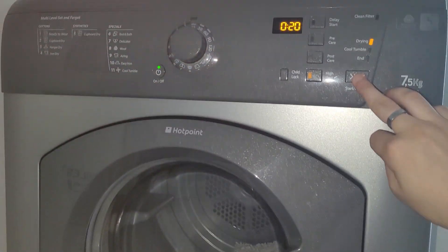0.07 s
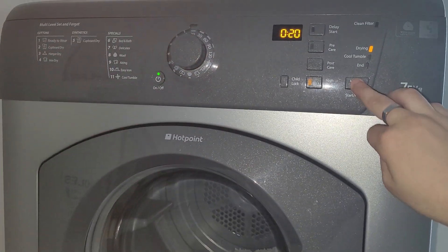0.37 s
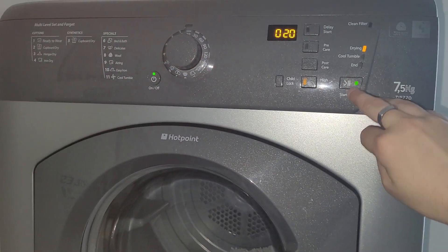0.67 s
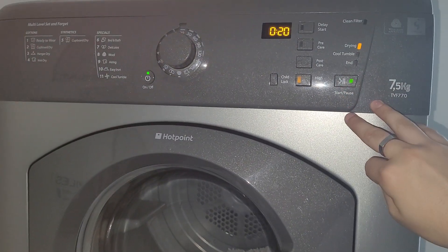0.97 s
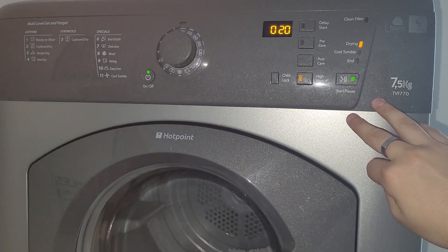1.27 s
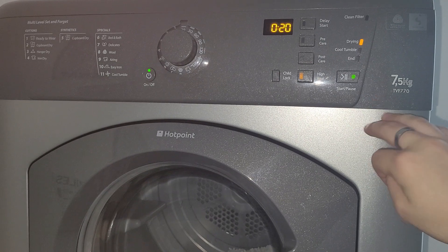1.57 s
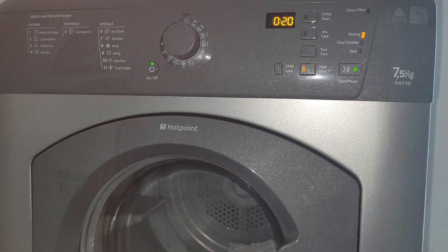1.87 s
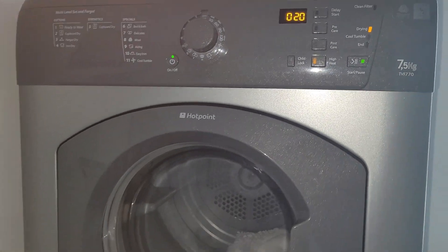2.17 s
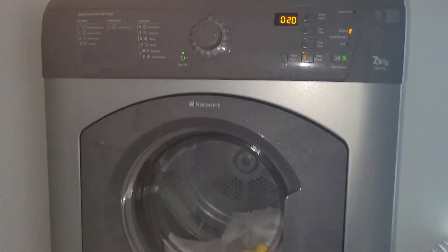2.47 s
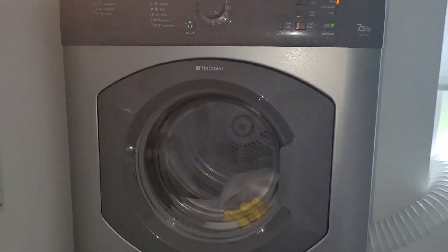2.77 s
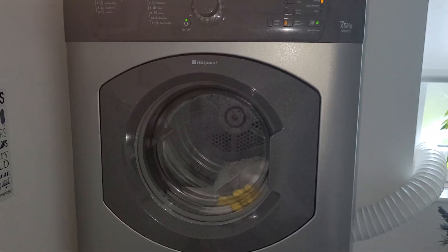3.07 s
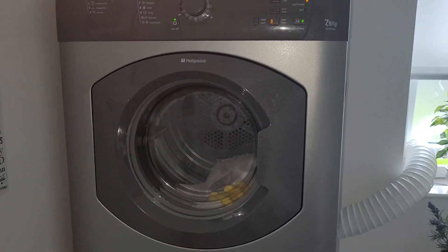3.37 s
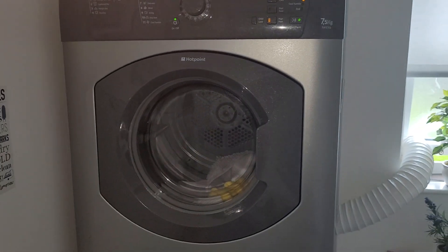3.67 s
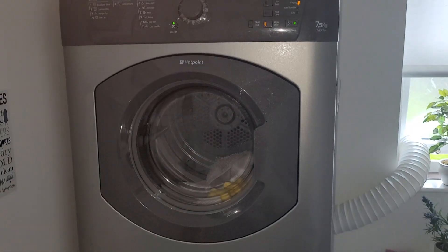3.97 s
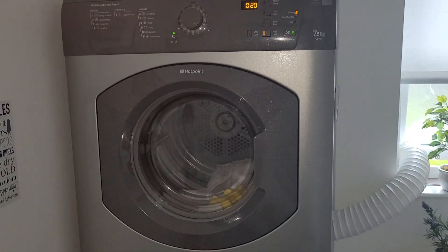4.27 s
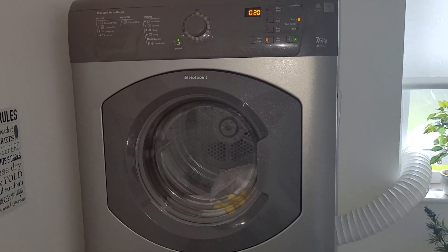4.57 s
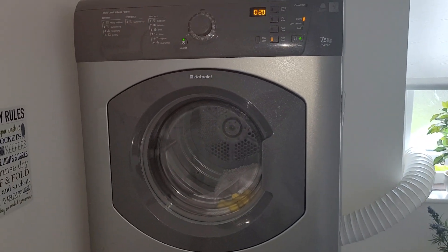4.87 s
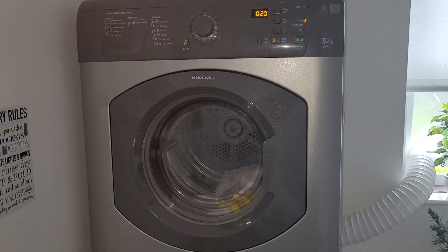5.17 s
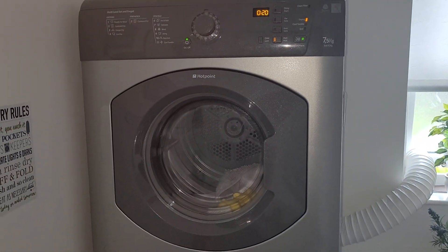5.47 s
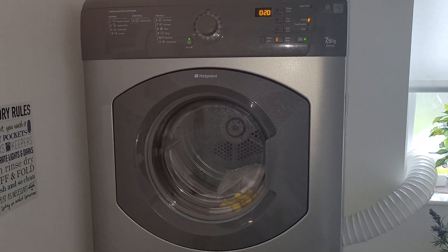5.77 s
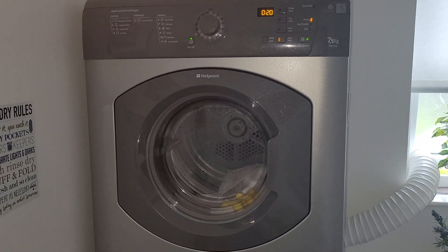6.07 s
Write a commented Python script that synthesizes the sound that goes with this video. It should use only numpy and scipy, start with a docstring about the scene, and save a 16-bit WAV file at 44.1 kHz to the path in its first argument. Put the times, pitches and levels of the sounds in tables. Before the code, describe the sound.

A tumble dryer is started in a small, hard-walled room, heard from nearby. A finger rubs faintly on a plastic button, then presses and releases it, giving a quick cluster of clicks from about 0.3 to 0.7 seconds, the last with a tiny spring ring. A quiet wait follows, with low room tone, faint sleeve rustle and a few soft bumps and ticks. At about 3.2 seconds a relay clicks and the motor starts with a growl, a rising whirr and a brief belt groan. By about 3.7 seconds it is at full speed and much louder than the pause. From there to the end, at around 6 seconds, the dryer runs steadily with a deep, slightly pulsing electric hum, a drum rumbling in its metal cabinet and a whoosh of fan air. Laundry hisses softly on the steel, sliding roughly every 0.6 seconds.

```python
"""A small, hard-walled room with a tumble dryer. A finger presses and releases the plastic start button;
a sleeve rustles through a quiet wait, then a relay closes. The induction motor growls, whirrs and hums
up to speed while the belt groans until it grips. The drum rumbles in its sheet-metal cabinet,
washing hisses on the steel and the fan blows air through the vent hose."""
import sys
import numpy as np
from scipy import signal
from scipy.fft import rfft, irfft
from scipy.io import wavfile

SR = 44100
rng = np.random.default_rng(int(sys.argv[2]) if len(sys.argv) > 2 else 0)


def digitize_waveform(pressure):
    """Quantize a signal to 16-bit integers and store it at the path in sys.argv[1].

    Rows of a 2-D input are taken as channels; values are limited to [-1, 1].
    """
    field = np.atleast_2d(pressure).T
    bounded = np.clip(field, -1, 1)
    quanta = np.round(bounded * 32767).astype(np.int16)
    wavfile.write(sys.argv[1], SR, quanta)


N = 269892
TIME = np.arange(N) / SR
FREQS = np.maximum(np.fft.rfftfreq(N, 1 / SR), 1)
MAINS_HZ, SHAFT_HZ = 50, 48.46
ROTOR_START_S = 3.2
# room sound field: (frequency [Hz], left-right correlation [-])
EAR_CORRELATION = [(30, 1), (100, 0.88), (180, 0.93), (330, 0.86), (650, 0.42), (1300, -0.31),
                   (2500, -0.067), (15000, -0.0096)]


def from_db(db):
    """Decibels to gain."""
    return 10 ** (np.asarray(db) / 20)


def unit_rms(x):
    """Scale to rms 1."""
    return x / np.sqrt(np.mean(x ** 2) + 1e-20)


def at_hz(points, hz=FREQS):
    """Interpolate a table over log frequency."""
    return np.interp(np.log(hz), np.log(np.array(points)[:, 0]), np.array(points)[:, 1])


def drift(rate_hz):
    """Random wander, rms 1."""
    return unit_rms(irfft(rfft(rng.standard_normal(N)) / (1 + (FREQS / rate_hz) ** 2), N))


def envelope(start_s, attack_s, hold_s, release_s):
    """Linear rise to 1, hold, exponential fall."""
    age = TIME - start_s
    return np.clip(age / attack_s, 0, 1) * np.exp(-np.maximum(age - attack_s - hold_s, 0) / release_s)


def resonances(modes):
    """Gain spectrum of steep-sided resonances."""
    power = sum(from_db(2 * db) / (1 + (2 * (FREQS - hz) / width_hz) ** 2) ** 2
                for hz, width_hz, db in modes)
    return np.sqrt(power)


def ring(x, modes):
    """Parallel two-pole resonators, alternating in sign."""
    out = 0
    for k, (hz, width_hz, db) in enumerate(modes):
        r = np.exp(-np.pi * width_hz / SR)
        mode = signal.lfilter([1, 0, -1], [1, -2 * r * np.cos(2 * np.pi * hz / SR), r * r], x)
        out = out + (-1) ** k * from_db(db) * (1 - r * r) / 2 * mode
    return out


def stereo_spectra(size, hz):
    """Left and right white-noise spectra: alike in the bass, diffuse above."""
    mid, side = rfft(rng.standard_normal((2, size)))
    alike = np.clip(at_hz(EAR_CORRELATION, hz), -.999, .999)
    return np.sqrt(1 + alike) * mid + np.sqrt(1 - alike) * side * [[1], [-1]]


def noise(colour):
    """Stereo noise with the given gain spectrum, rms 1."""
    # stereo balance: (frequency [Hz], left minus right [dB])
    balance = [(60, 0), (92, 0.5), (140, 2.5), (210, 1.5), (330, -2.5), (500, -0.5), (770, -0.5),
               (1170, -3), (1790, 0.5), (2740, 2), (4190, 2), (6410, -4), (9810, 0.5), (15000, 1)]
    pan = from_db(at_hz(balance) / 2 * [[1], [-1]])
    return unit_rms(irfft(stereo_spectra(N, FREQS) * colour * pan, N))


def room_response(direct_db, build_s=0.0017):
    """Direct path plus dense wall reflections, longest in the low mids; energy 1."""
    # reverberation: (frequency [Hz], T60 [s])
    decay_times = [(100, 0.17), (260, 0.46), (700, 0.41), (1840, 0.25), (4850, 0.28), (12800, 0.26)]
    t = TIME[:SR // 2]
    hz = np.maximum(np.fft.rfftfreq(len(t), 1 / SR), 1)
    spectra = stereo_spectra(len(t), hz)
    centres_hz, t60s = np.transpose(decay_times)
    bands = [np.interp(np.log(hz), np.log(centres_hz), row) for row in np.eye(len(t60s))]
    tail = sum(irfft(spectra * band, len(t)) * from_db(-60 * t / t60) for band, t60 in zip(bands, t60s))
    response = unit_rms(tail * (1 - np.exp(-t / build_s))) / np.sqrt(len(t))
    response[:, 0] += from_db(direct_db)
    return unit_rms(response) / np.sqrt(len(t))


def murmur(corner_hz=7000):
    """Dull noise in the colour of the quiet room."""
    # spectrum before the low-pass: (frequency [Hz], relative density [dB])
    spectrum = [(15, -39), (25, -7.5), (152, -8.5), (189, -11.5), (261, -2.5), (392, -8), (729, -15),
                (955, -18), (1090, -24.5), (2030, -31.5), (2520, -35), (5090, -46), (7420, -33.5),
                (9210, -45), (15800, -25)]
    return noise(from_db(at_hz(spectrum)) / np.hypot(1, (FREQS / corner_hz) ** 2))


def room_tone(tone_db=-59.5, sway_db=0.9, stir_db=-74.5, stir_spread_db=4.0):
    """A low murmur with an uneven midrange stir."""
    # (frequency [Hz], width [Hz], gain [dB])
    stir_bands = [(800, 340, -5.0), (1470, 300, -13), (2910, 170, -22.5)]
    stir = from_db(stir_db + stir_spread_db * drift(12.0)) * noise(resonances(stir_bands))
    return from_db(tone_db + sway_db * drift(8.3)) * murmur() + stir


def finger_squeak(squeak_db=-72.0, rub_db=-55.5):
    """Skin settles on the plastic button: a faint squeak over a dull rub."""
    # skin on plastic: (frequency [Hz], width [Hz], gain [dB])
    squeak_modes = [(2810, 220, -1), (3920, 540, -14), (6860, 1200, -16)]
    rubbing = from_db(squeak_db) * noise(resonances(squeak_modes)) + from_db(rub_db) * murmur()
    return envelope(0, attack_s=0.015, hold_s=0.041, release_s=0.1) * rubbing


def button_and_relay(level_window_s=0.023):
    """Each contact rings panel, button and spring into the room; a slow push swells slowly."""
    # contacts: (time [s], swell [s], direct path [dB], panel [dB], button [dB], tick [dB], spring [dB])
    contacts = [(0.2879, 0.0048, -21, -38.5, -31.5, -51, -78), (0.413, 0.0016, -15, -46, -47, -53, -83),
                (0.554, 0.0018, -13, -33, -55, -63, -81), (0.562, 0.0033, -19, -32, -39.5, -56, -79),
                (0.5987, 0.0004, -9, -63, -36, -55.5, -82), (0.680, 0.0034, -26, -69, -43.5, -54.5, -45.5),
                (3.172, 0.0051, -19.5, -41.5, -52, -48, -66)]
    # thud, clack, tick and ring modes: (frequency [Hz], width [Hz], gain [dB])
    panel = [(50, 9.6, -6), (122, 22, -2), (184, 26, 3), (253, 60, -1), (417, 58, 1), (519, 18, -1.5),
             (626, 46, -11)]
    button = [(834, 510, -5), (1390, 270, 2), (1640, 400, 0), (2130, 330, 1.5), (2870, 500, -4.5),
              (3680, 260, -5), (4180, 350, -8.5)]
    tick = [(3980, 3000, 7.9), (7360, 4800, 8.7), (10570, 3600, 5.7), (15000, 2800, 8.1)]
    spring = [(1670, 120, 2.5), (7040, 120, 0.5), (8100, 600, -8.5), (11100, 700, -13.5)]
    out = np.zeros((2, N))
    for time_s, swell_s, direct_db, *levels_db in contacts:
        impact = room_response(direct_db, swell_s)
        start, size = int(time_s * SR), impact.shape[1]
        for modes, db in zip((panel, button, tick, spring), levels_db):
            gain = from_db(db) * np.sqrt(level_window_s * SR / size)
            out[:, start:start + size] += gain * unit_rms(ring(impact, modes))
    return out


def handling_knocks(width_share=0.35):
    """Faint padded knocks, each a puff of noise around one pitch."""
    # (time [s], level [dB], pitch [Hz])
    knocks = [(0.99, -64, 910), (1.44, -66, 800), (1.55, -64, 764), (2.43, -71, 2000), (2.61, -64, 720),
              (3.01, -68, 1300)]
    out = 0
    for time_s, db, hz in knocks:
        level = from_db(db) * envelope(time_s, attack_s=0.01, hold_s=0.015, release_s=0.045)
        out = out + level * noise(resonances([(hz, width_share * hz, 0)]))
    return out


def hand_rustle(sleeve_db=-78.0):
    """The sleeve whispers as the hand draws back; sharper moves add a swish and a dull bump."""
    # (start [s], attack [s], release [s], swish [dB], bump [dB])
    moves = [(1.08, .04, .05, -83, -70), (1.27, .035, .04, -79, -64), (1.39, .1, 0.29, -97, -60),
             (1.57, .02, .03, -70, -75), (1.64, .05, 0.053, -76, -78), (1.955, 0.034, 0.039, -61, -56.5),
             (2.41, 0.051, 0.024, -67.5, -55), (3.0, .012, 0.044, -76, -58.5)]
    # sleeve cloth: (frequency [Hz], relative density [dB])
    spectrum = [(1000, -8), (2300, -14), (4500, 0), (7000, -1), (9000, -1.5), (12000, 2), (15000, 8)]
    swish = from_db(sleeve_db + 2 * drift(4)) * envelope(1.5, attack_s=0.36, hold_s=0.56, release_s=1.6)
    bump = 0
    for start_s, attack_s, release_s, swish_db, bump_db in moves:
        shape = envelope(start_s, attack_s, 0, release_s)
        swish = np.hypot(swish, from_db(swish_db) * shape)
        bump = bump + from_db(bump_db) * shape
    return swish * noise(from_db(at_hz(spectrum))) + bump * murmur()


def near_ticks():
    """Tiny ticks, close and dry."""
    # (time [s], peak [dB], centre [Hz], width [Hz])
    ticks = [(2.0995, -51.5, 595, 890), (2.4237, -54, 8500, 4000)]
    impulse = signal.unit_impulse(SR // 100)
    out = np.zeros(N)
    for time_s, db, hz, width_hz in ticks:
        tick = ring(ring(impulse, [(hz, width_hz, 0)]), [(hz, 2 * width_hz, 0)])
        start = int(time_s * SR)
        out[start:start + len(tick)] += from_db(db) * tick / np.abs(tick).max()
    return out


def motor_strain(strain_db=-43.0, power_on_s=3.18, buzz_depth=0.19):
    """Starting current makes the frame growl, pulsing at twice the mains frequency."""
    # motor frame: (frequency [Hz], width [Hz], gain [dB])
    frame_modes = [(256, 76, 2.5), (276, 34, -0.5), (399, 60, 4), (720, 410, -8), (1830, 360, -18.5),
                   (2570, 650, -24), (3950, 500, -32)]
    level = from_db(strain_db) * envelope(power_on_s, attack_s=0.12, hold_s=0.12, release_s=0.11)
    pulses = 1 + buzz_depth * np.sin(2 * np.pi * 2 * MAINS_HZ * TIME)
    return level * pulses * noise(resonances(frame_modes))


def motor_speed(run_up_s=0.5):
    """Share of full speed: the rotor picks up briskly, then eases in."""
    return np.sin(np.pi / 2 * np.clip((TIME - ROTOR_START_S) / run_up_s, 0, 1))


def belt_groan(speed, groan_db=-39.0, swell_db=16.0, rough_db=2.5, low_hz=389.0, rise_hz=69.0):
    """The belt drags on the heavy drum, higher and louder with speed, until it grips."""
    drag = speed ** 3
    slipping = envelope(ROTOR_START_S, attack_s=0.1, hold_s=0.31, release_s=0.03)
    level = from_db(groan_db - swell_db * (1 - drag) + rough_db * drift(25)) * slipping
    phase = 2 * np.pi * np.cumsum(low_hz + rise_hz * drag) / SR + 0.6 * drift(15)
    return np.sqrt(2) * level * np.sin(phase)


def rotating_parts(speed, wander_rad=0.24, flutter_db=2.5, right_bias_db=4.5, right_lag_s=0.00037):
    """Shaft unbalance, fan blades, belt and rollers sing tones that rise and swell with speed."""
    # shaft and fan at full speed: (shaft multiple [-], level [dB])
    shaft_orders = [(1, -43.5), (5, -52), (6, -41.5), (7, -50), (9, -54), (21, -57)]
    # belt and rollers at full speed: (frequency [Hz], level [dB])
    pulley_tones = [(261.5, -55.5), (327, -59), (448.6, -44)]
    travel_s = np.cumsum(speed) / SR - np.array([[0], [right_lag_s]])
    tones = 0
    for hz, db in [(k * SHAFT_HZ, db) for k, db in shaft_orders] + pulley_tones:
        phase = 2 * np.pi * (hz * travel_s + rng.random()) + wander_rad * drift(1.6)
        tones = tones + from_db(db + flutter_db * drift(5.8)) * np.sin(phase)
    pan = from_db([[-right_bias_db / 2], [right_bias_db / 2]])
    return np.sqrt(2) * tones * speed ** 3.8 * pan


def drum_rumble(speed, rumble_db=-31.0, tumble_db=0.5, judder_hz=44.2, judder_depth=0.16):
    """The drum judders on its bearings and drives the cabinet's resonances."""
    # cabinet and drum: (frequency [Hz], width [Hz], gain [dB])
    cabinet_modes = [(30, 14, -22), (64.4, 10.4, 1.5), (88.1, 11.5, 5.5), (127, 14.6, -4.5),
                     (149.7, 28, -9), (183, 45, -20), (229.4, 12, -11), (258, 27, -4), (249, 15, -8),
                     (281, 16, -1.5), (330.5, 19.7, 2), (371, 19, -7), (412, 59, -6.5), (433, 61, -10),
                     (458, 96, -9), (495, 22, -16), (593, 29, -14), (652, 27.6, -9), (760, 69, -14.5),
                     (858, 27, -19.5), (1013, 5.5, -21), (1264, 33, -18.5)]
    judder_phase = 2 * np.pi * judder_hz * np.cumsum(speed) / SR + 2 * drift(0.97)
    level = from_db(rumble_db + tumble_db * drift(8.5)) * speed ** 4.7
    return level * (1 + judder_depth * np.sin(judder_phase)) * noise(resonances(cabinet_modes))


def fan_air(speed, rush_db=-43.5, duct_db=-53):
    """Fan air grows with speed; housing and hose ring before the rush builds."""
    # air rush: (frequency [Hz], relative density [dB])
    spectrum = [(300, -42), (550, -9.5), (850, -9.5), (1100, -14), (1400, -16), (2200, -15), (2600, -20),
                (3500, -18.5), (4200, -21), (4700, -26.5), (6000, -32.5), (7500, -34), (9000, -53)]
    # fan housing and vent hose: (frequency [Hz], width [Hz], gain [dB])
    duct_modes = [(1190, 40, -23), (1480, 30, -14), (1796, 130, -14.5), (2285, 120, -19.5), (2840, 39, -15),
                  (3090, 31, -19), (3910, 60, -16), (3884, 330, -17)]
    rush = from_db(rush_db) * speed ** 2.8 * noise(from_db(at_hz(spectrum)))
    duct = from_db(duct_db) * speed ** 1.3 * noise(resonances(duct_modes))
    return rush + duct


def washing_slides(speed, drag_db=-55.0, slide_db=-54.0, bright_hz=9000.0, loosen_s=1.0):
    """Washing hisses on the steel: a steady drag, and two brighter slides each time a paddle tips it."""
    first_tip_s, tip_every_s = 3.49, 0.585
    folds = [(0, 0), (0.17, -5)]   # (delay [s], gain [dB])
    tips_s = first_tip_s + tip_every_s * np.arange(N / SR / tip_every_s)
    slides = sum(from_db(db) * envelope(tip_s + delay_s, attack_s=0.057, hold_s=0.04, release_s=0.05)
                 for tip_s in tips_s for delay_s, db in folds)
    # cloth on steel: (frequency [Hz], relative density [dB])
    spectrum = [(3000, -22), (5000, 0), (6500, -3), (7800, -5), (8900, -9.5), (10300, -4.5), (13400, -5.5),
                (14400, 1), (15100, 3.5), (15800, -5.5)]
    colour = from_db(at_hz(spectrum))
    bright = colour / np.hypot(1, (bright_hz / FREQS) ** 2)
    loosened = np.clip((TIME - ROTOR_START_S) / loosen_s, 0, 1)
    drag = from_db(drag_db) * noise(colour)
    return speed ** 1.7 * (drag + from_db(slide_db) * loosened * slides * noise(bright))


def motor_hum(hum_db=-27.0, start_s=3.236, attack_s=0.2, beat_depth=0.2, beat_trough_s=4.07):
    """Iron hums at twice the mains, dips as the run-up ends and beats against the slipping rotor."""
    # (hum harmonic [-], gain [dB])
    partials = [(1, -1), (2, -25), (3, -22), (4, -48.5)]
    dip_db, dip_s, dip_width_s = -6.5, 3.64, 0.084
    dip = np.exp(-((TIME - dip_s) / dip_width_s) ** 2)
    level = from_db(hum_db + dip_db * dip) * np.clip((TIME - start_s) / attack_s, 0, 1)
    phase = 2 * np.pi * 2 * MAINS_HZ * TIME + 0.08 * drift(11.0)
    slip_phase = 2 * np.pi * 2 * (MAINS_HZ - SHAFT_HZ) * (TIME - beat_trough_s)
    hum = sum(from_db(db) * np.sin(k * phase + rng.uniform(0, 2 * np.pi) * (k > 1))
              for k, db in partials)
    return np.sqrt(2) * level * (hum - beat_depth * np.sin(phase - slip_phase))


def rotor_whirr(speed, whirr_db=-46.0, low_hz=636.0, rise_hz=275.3, half_width_hz=125.0):
    """A narrow noise band slides up with the rotor and fades as the starting current drops."""
    level = from_db(whirr_db) * envelope(3.3, attack_s=0.085, hold_s=0.025, release_s=0.1)
    flutter = noise(1 / (1 + (FREQS / half_width_hz) ** 4))
    phase = 2 * np.pi * np.cumsum(low_hz + rise_hz * speed) / SR
    return np.sqrt(2) * level * flutter * np.sin(phase)


def cloth_brush(brush_db=-52.5, start_s=5.105):
    """One fold brushes briefly across the drum."""
    bands = [(7000, 4000, 0), (14000, 6000, -5)]   # (frequency [Hz], width [Hz], gain [dB])
    level = from_db(brush_db) * envelope(start_s, attack_s=0.015, hold_s=0.015, release_s=0.013)
    return level * noise(resonances(bands))


def scene(eddy_db=0.05):
    """Clicks, a wait, then the run-up; air and washing waver slightly and sound through the room."""
    speed = motor_speed()
    hand = finger_squeak() + near_ticks() + hand_rustle() + handling_knocks()
    run_up = motor_strain() + rotor_whirr(speed) + belt_groan(speed)
    running = motor_hum() + rotating_parts(speed) + drum_rumble(speed)
    hiss = fan_air(speed) + washing_slides(speed) + cloth_brush()
    hiss *= from_db(-eddy_db * drift(25))
    hiss_in_room = signal.fftconvolve(hiss, room_response(direct_db=1.5), axes=1)[:, :N]
    return hand + button_and_relay() + run_up + running + hiss_in_room + room_tone()


def record(dry, low_cut_hz=20, high_cut_hz=15850):
    """The deepest bass rolls off; the top is cut steeply."""
    thinned = signal.sosfilt(signal.butter(2, low_cut_hz, "high", fs=SR, output="sos"), dry)
    return signal.sosfilt(signal.ellip(12, .1, 80, high_cut_hz, fs=SR, output="sos"), thinned)


dry = scene()
out = record(dry)
digitize_waveform(out)
```